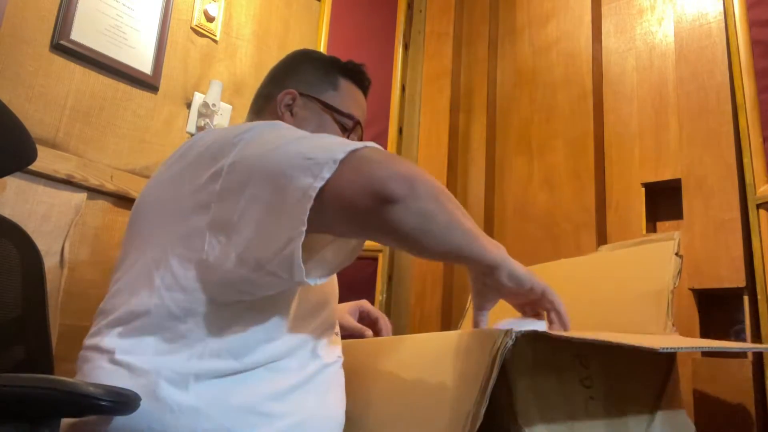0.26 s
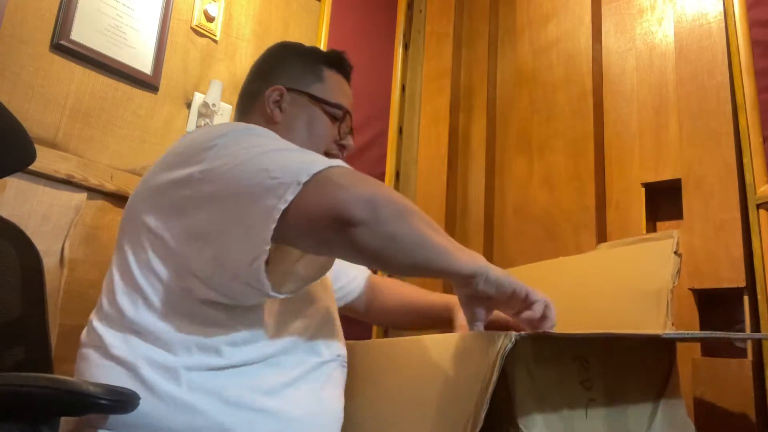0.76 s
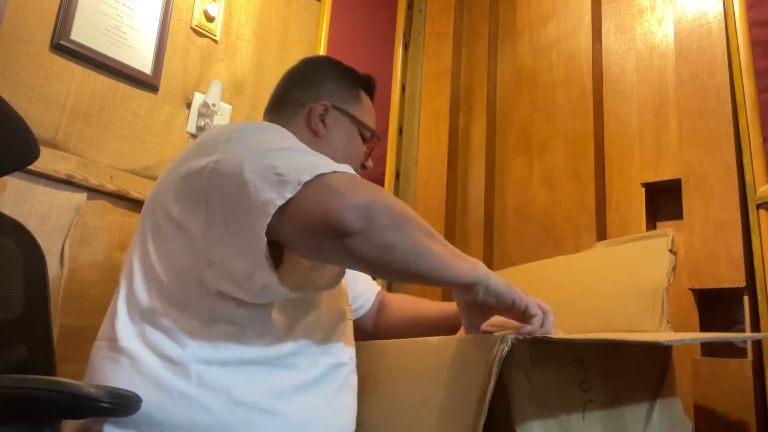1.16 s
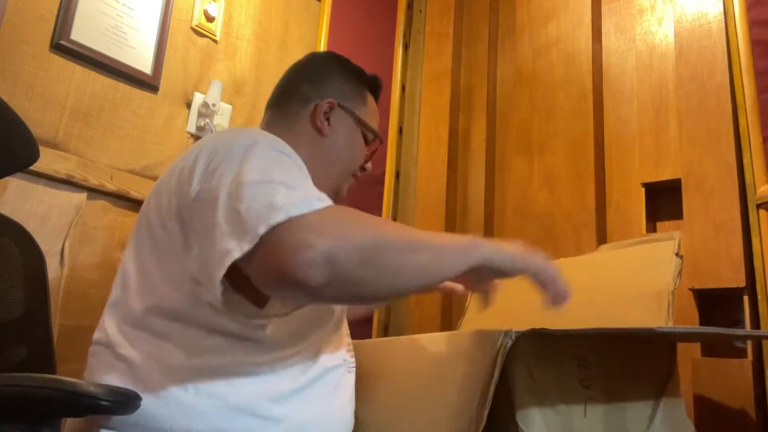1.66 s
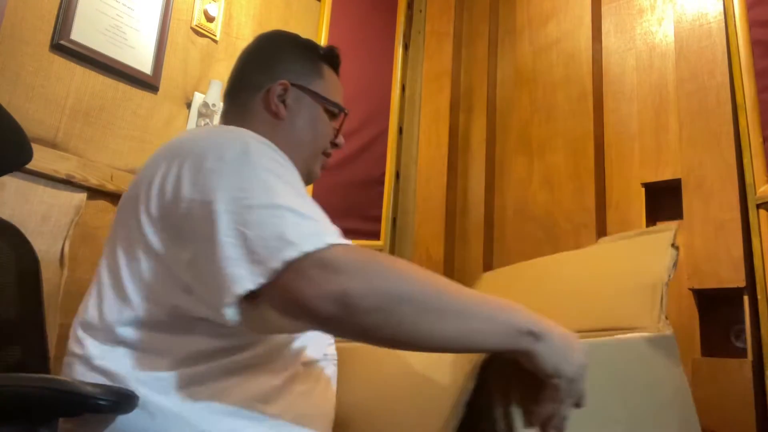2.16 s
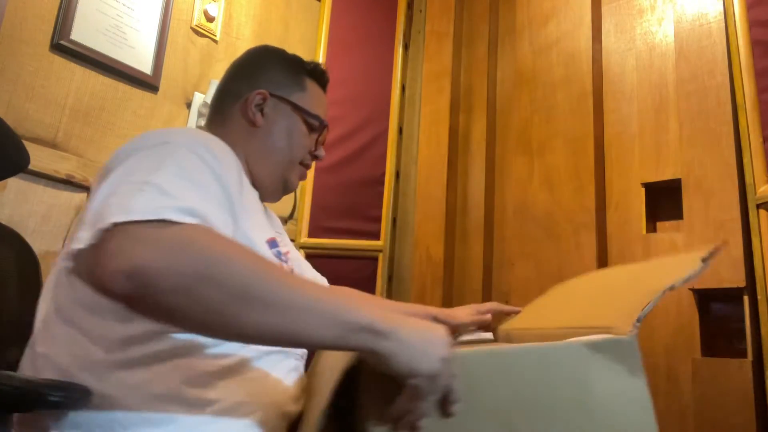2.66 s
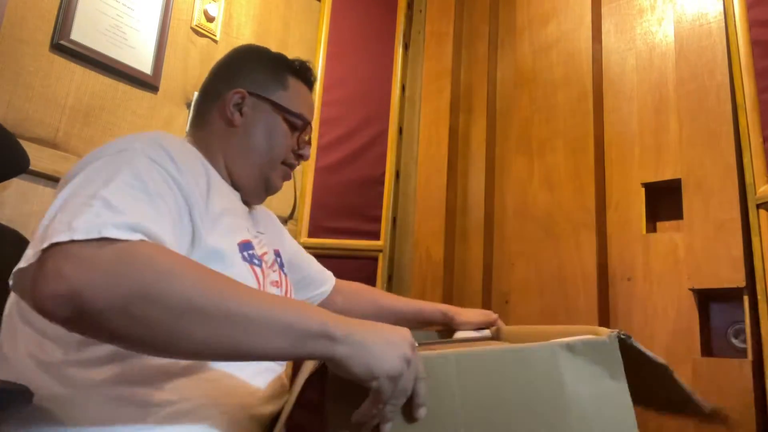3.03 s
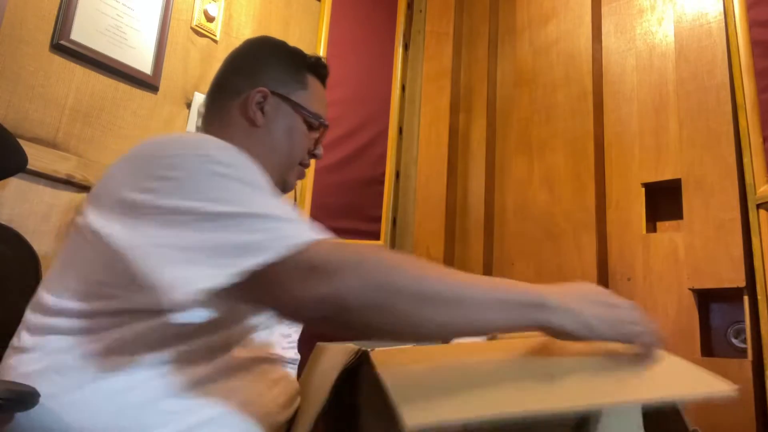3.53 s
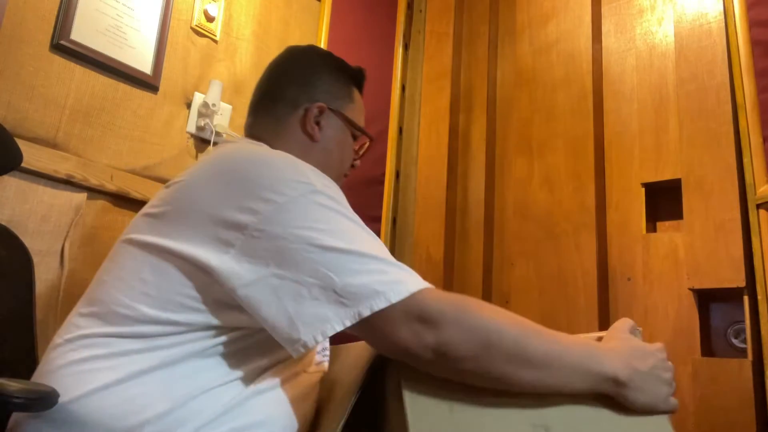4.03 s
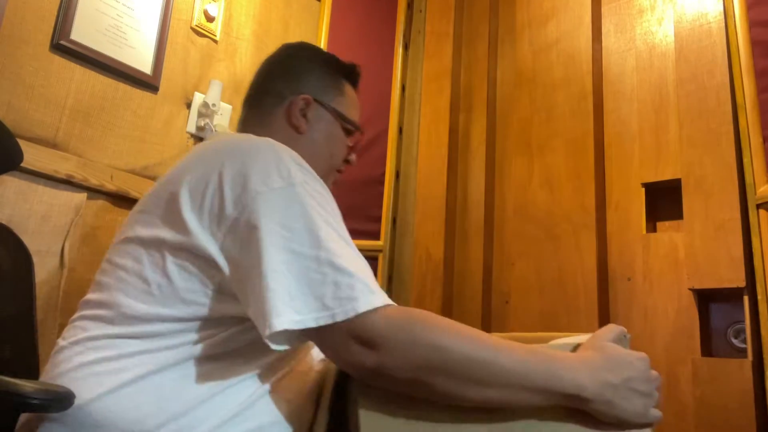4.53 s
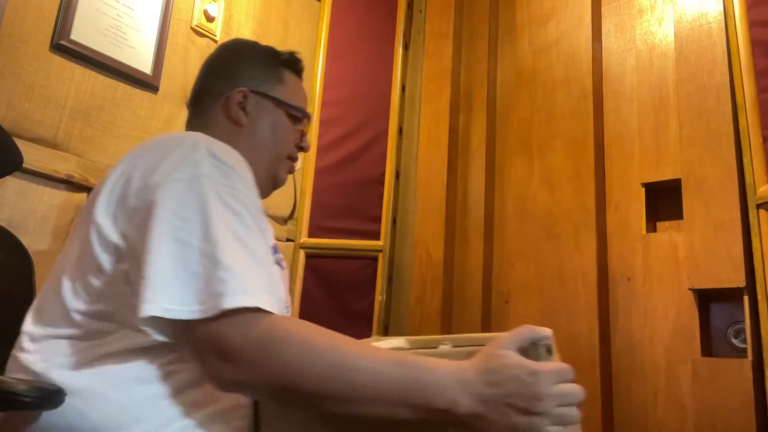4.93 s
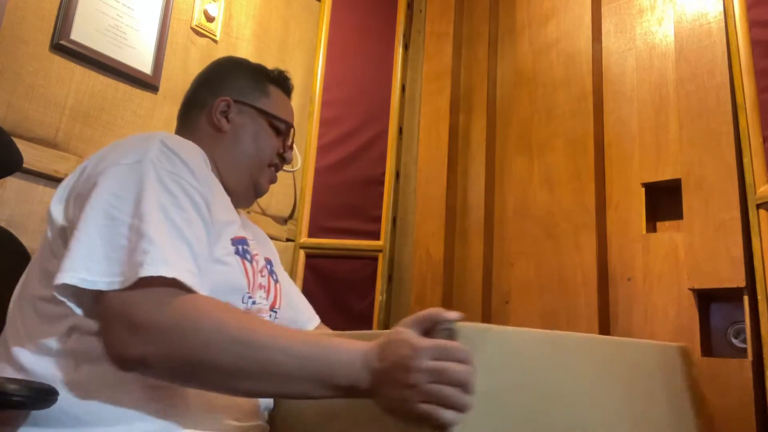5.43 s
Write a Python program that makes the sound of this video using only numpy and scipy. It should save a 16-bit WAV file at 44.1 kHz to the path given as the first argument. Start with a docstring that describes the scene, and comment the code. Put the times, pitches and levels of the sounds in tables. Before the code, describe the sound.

A large cardboard carton is handled close to a stereo microphone pair in a small, dry wood-panelled room. A dull knock and rub open it, then quiet shuffling, a busy run of flap knocks and scrapes, a loud flat slap, and finally growing raspy dragging with a heavy hollow thump.

```python
"""A cardboard carton is knocked, rubbed and dragged by hands in a small wood-panelled room.
Knocks ring modes of its flaps, creases and walls, with paper bursts; ticks ring tight clusters of paper modes.
Rubbing and rasping are gritty noise shaped by spectra and narrow bands; squeaks are noise in narrow bands.
A decaying-noise room answers the knocks and ticks; a close pair of microphones listens."""
import sys
import numpy as np
from scipy import signal
from scipy.fft import rfft, irfft, next_fast_len
from scipy.io import wavfile
from scipy.ndimage import uniform_filter1d

SR = 44100
rng = np.random.default_rng(int(sys.argv[2]) if len(sys.argv) > 2 else 0)


def master(y):
    """Save y as 16-bit WAV."""
    cut = np.clip(np.atleast_2d(y).T, -1, 1)
    pcm = np.round(cut * 32767)  # scale
    wavfile.write(sys.argv[1], SR, pcm.astype(np.int16))


N = 250693

# blows on the board, levels before the layer trims: t/s, clack level/dB, clack f/Hz, snap level/dB, snap f/Hz,
# crack level/dB, spit level/dB, boom level/dB, boom f/Hz
KNOCKS = [(0.163, -14.5, 305, -17, 1660, -36.5, -33.5, -20.5, 116),
          (0.185, -30, 252, -60, 1300, -65, -65, -28, 100), (0.524, -28, 388, -35, 1400, -56, -77, -38, 74),
          (0.691, -33, 350, -35, 1700, -46, -70, -62, 86),
          (0.83, -35.5, 322, -36, 1330, -54.5, -70, -62, 70),
          (1.02, -46, 458, -39, 870, -61, -76, -41.5, 113),
          (1.352, -43, 434, -49, 1180, -65, -84, -71, 109),
          (1.442, -37, 244, -65, 1370, -76, -66, -47, 152),
          (1.818, -26.5, 298, -72, 929, -78, -48, -22.5, 143),
          (1.938, -33.5, 433, -45, 1350, -54, -61, -31, 126),
          (1.988, -55, 283, -56, 2200, -55, -67, -34, 130),
          (2.039, -33.5, 543, -42, 977, -55, -71, -39, 117),
          (2.098, -19, 374, -35.5, 960, -60, -46, -39, 190),
          (2.13, -29, 244, -65, 1440, -60, -61, -25.5, 105),
          (2.221, -23, 324, -47, 1370, -51, -46, -30, 125), (2.231, -34, 276, -55, 923, -62, -57, -15, 118),
          (2.327, -67, 470, -22.5, 945, -45, -64, -29, 102),
          (2.347, -20, 364, -19, 1390, -47, -46, -28, 143), (2.4, -31, 360, -41, 1150, -59, -57, -30, 128),
          (2.466, -33.5, 238, -39, 1340, -60, -65, -55, 105),
          (2.507, -34.5, 315, -56, 1220, -65, -79, -38, 80),
          (2.603, -37, 317, -36.5, 1330, -52.5, -54, -65, 94),
          (2.651, -48, 320, -39, 1300, -76, -70, -63, 110),
          (2.701, -45, 397, -69, 1370, -42, -45, -59, 122),
          (2.864, -40.5, 300, -29, 1220, -59, -49, -47, 128),
          (3.123, -42, 243, -63, 1160, -74, -69, -33, 112),
          (3.353, -29, 510, -30.5, 1350, -43, -36, -61, 188),
          (3.363, -27.5, 250, -35, 1110, -49, -47, -65, 178),
          (3.434, -4.5, 506, -6, 1140, -49, -33, -24.5, 195),
          (3.443, -11, 250, -43, 851, -68, -58, -59, 167),
          (3.483, -34, 392, -62, 861, -62, -40, -34.5, 104),
          (3.753, -28.5, 540, -32, 1200, -53, -61, -37.5, 152),
          (3.788, -50, 300, -62, 1200, -53, -70, -43.5, 69),
          (3.883, -31.5, 264, -38, 1050, -52.5, -51, -26, 151),
          (3.97, -42, 520, -52, 1200, -64, -70, -58, 120),
          (4.032, -68, 300, -58, 1200, -77, -47.5, -66, 109),
          (4.07, -34, 355, -37, 1150, -54.5, -68, -21.5, 105.6),
          (4.351, -75, 234, -29.5, 1130, -66, -64.5, -47, 69.5),
          (4.558, -60, 288, -55, 1180, -46, -65, -44.5, 163),
          (4.602, -26.5, 365, -35, 1400, -52, -57, -43, 137),
          (4.712, -24, 213, -24, 1060, -45, -52, -25.5, 89),
          (5.022, -47, 500, -30.5, 1380, -59, -62, -46, 109),
          (5.114, -61, 500, -37, 1100, -60, -65, -51, 110),
          (5.158, -46, 520, -35, 1350, -59, -65, -59, 110),
          (5.208, -26, 560, -40, 1210, -54, -54, -35, 114),
          (5.243, -66, 500, -23.5, 1380, -41, -54, -32.5, 116),
          (5.312, -24, 238, -34, 1080, -45, -56, -30, 111),
          (5.44, -9, 178, -13.5, 920, -44.5, -37, -14, 103),
          (5.468, -18.5, 233, -56, 1300, -65, -65, -23, 110),
          (5.513, -20, 260, -43, 1320, -55, -43, -22.5, 118),
          (5.563, -30.5, 327, -55, 1460, -63, -74, -34, 118)]
# modes of big walls and air, of flaps, of stiff creases: f/Hz, relative level/dB, t60/s before hand damping
WALLS = [(55.3, 11.5, 0.29), (91.1, 6.5, 0.2), (108, 7, 0.15), (121.4, 4, 0.22), (143.3, 1, 0.22)]
FLAPS = [(193, 3.5, 0.05), (256.5, 4.5, 0.055), (293.4, 1, 0.054), (337, 1.5, 0.057), (438.5, 2, 0.063),
         (499, 5.5, 0.064), (554, -11, 0.037), (654, 2, 0.059)]
CREASES = [(974, 7.5, 0.034), (1116, 3, 0.02), (1232, 1, 0.024), (1372, -1, 0.02), (1730, -9.5, 0.035),
           (1836, -7.5, 0.056), (2055, 0, 0.026), (2280, -7, 0.008)]
# spectra of surface hiss and of fine fizz on paper: f/Hz, relative level/dB
HISS_SPECTRUM = [(800, -10.5), (1800, -3), (3000, -3), (5000, -5), (7500, -9), (10000, -14.5), (13000, -23)]
FIZZ_SPECTRUM = [(4000, -16.5), (7000, -8.5), (9500, -5), (12000, -9), (14500, -11.5), (16000, -24)]


def amp(db):
    """Amplitude ratio of a level in dB."""
    return 10 ** (np.asarray(db) / 20)


def unit(x):
    """x scaled to an RMS of 1."""
    return x / np.sqrt(np.mean(x ** 2) + 1e-20)


def along(points, hz):
    """Every column after the frequency, interpolated on a log-frequency axis."""
    f, *cols = np.transpose(points)
    return np.squeeze([np.interp(np.log(hz + 1), np.log(f + 1), c) for c in cols])


def filtered(x, response):
    """x filtered by a complex response of frequency."""
    m = next_fast_len(N + SR // 2)
    return irfft(rfft(x, m) * response(np.fft.rfftfreq(m, 1 / SR)), m)[..., :N]


def resonances(modes, hz, widen):
    """Sum of band-pass modes of alternating sign; t60 sets each width, scaled by widen."""
    total = 0
    for k, (centre_hz, db, t60_s) in enumerate(modes):
        width_hz = widen * np.log(1000) / np.pi / t60_s
        damped = 1j * hz * width_hz
        total = total + (-1) ** k * amp(db) * damped / (centre_hz ** 2 - hz ** 2 + damped)
    return total


def grit(per_s, spread_db, patchy_db):
    """Two noise streams roughened by shared tiny slips of uneven size, in patches of random gain."""
    slips = (rng.random(N) < per_s / SR) * amp(spread_db * rng.standard_normal(N))
    rough = 1 + signal.lfilter([1], [1, -.97], slips)  # each slip lasts about a millisecond
    z = signal.stft(rough * rng.standard_normal((2, N)), nperseg=512)[2]
    field = rng.standard_normal(z.shape[1:])
    field = uniform_filter1d(field, size=3, axis=0)  # frequency bins
    field = uniform_filter1d(field, size=8, axis=1)  # time frames
    return signal.istft(z * amp(patchy_db * unit(field)), nperseg=512)[1][:, :N]


def ring(modes, centre_hz, focus_db, damping, rise, t):
    """One blow on two paths: modes near the centre ring most, with random strength and slight detuning."""
    hz, db, t60_s = np.transpose(modes)[..., None]
    detune, strength_db, indirect_gain = rng.standard_normal((3, len(modes), 1)) * [[[.02]], [[2.5]], [[.8]]]
    phase = 2 * np.pi * hz * (1 + detune) * t
    off_centre_db = focus_db * np.log2(hz / centre_hz) ** 2  # focus_db at one octave away
    gain = amp(db + strength_db - off_centre_db - 60 * damping * t / t60_s)
    gain = gain * (1 - np.exp(-t / rise)) ** 2
    direct = (gain * np.sin(phase)).sum(axis=0)
    indirect = (indirect_gain * gain * np.cos(phase)).sum(axis=0)
    return np.array([direct, indirect]) / abs(direct).max()


def knocks():
    """Each contact clacks in the flaps, snaps in the creases, cracks and spits in the paper; the walls follow."""
    wall_delay_s = .006  # the heavy walls take time to get moving
    contact_cycles = 2.51  # contact time in clack periods: soft broad blows sound low
    base_damping, presses_per_db = 1.266, .02  # 1 = free board; stronger blows leave the hand pressing
    board, paper = np.zeros((2, N + SR)), np.zeros((2, 2, N + SR))
    t = np.arange(SR // 4) / SR
    for s, db, hz, snap_db, snap_hz, crack_db, spit_db, boom_db, boom_hz in KNOCKS:
        at, late = round(s * SR), round((s + wall_delay_s) * SR)
        contact_s = contact_cycles / hz
        damping = base_damping * np.exp(presses_per_db * (db + 33.5))
        clack = ring(FLAPS, hz, focus_db=35.5, damping=damping, rise=.53 * contact_s, t=t)
        snap = ring(CREASES, snap_hz, focus_db=49, damping=damping, rise=.16 * contact_s, t=t)
        boom = ring(WALLS, boom_hz, focus_db=58, damping=damping, rise=.0048, t=t)
        board[:, at:at + len(t)] += amp(db - 3) * clack + amp(snap_db - .5) * snap
        board[:, late:late + len(t)] += amp(boom_db - 2) * boom
        envelope = (1 - np.exp(-t / .0035)) * np.exp(-t / contact_s)
        burst = envelope * rng.standard_normal((2, 2, len(t)))
        paper[..., at:at + len(t)] += amp([[[crack_db + 18]], [[spit_db + 6]]]) * burst
    crack = filtered(paper[0, :, :N], lambda hz: amp(along(HISS_SPECTRUM, hz)))
    spit = filtered(paper[1, :, :N], lambda hz: amp(along(FIZZ_SPECTRUM, hz)))
    return board[:, :N] + crack + spit


def ticks():
    """A paper edge lets go: each dry tick rings a tight cluster of paper modes for a few milliseconds."""
    # t/s, direct-path peak level/dB, f/Hz
    tick_list = [(0.165, -48, 4300), (0.65, -42.5, 1290), (0.69, -39, 2220), (0.699, -35, 2770),
                 (1.938, -34.5, 2200), (2.33, -42, 2940), (2.346, -30.5, 5700), (2.466, -31, 5000),
                 (2.865, -40, 1480), (3.754, -32, 1770), (5.44, -48, 1950), (2.704, -31, 4350),
                 (2.709, -40, 3900), (3.435, -39, 2180), (3.433, -34, 4270), (4.607, -42, 2520),
                 (4.713, -39, 1810), (4.737, -24.5, 2440), (5.25, -26, 2650)]
    t60_s = .009
    out, t = np.zeros((2, N + SR)), np.arange(SR // 20) / SR
    for s, db, hz in tick_list:
        cluster = [(hz * step, 0, t60_s) for step in (.74, .83, .91, .97, 1.04, 1.12, 1.22, 1.35)]
        tick = ring(cluster, hz, focus_db=60, damping=1, rise=.0005, t=t)
        out[:, round(s * SR):][:, :len(t)] += amp(db) * tick
    return out[:, :N]


def rubbing():
    """Sliding contact shakes the walls, excites flaps and creases, and hisses and fizzes on the surface."""
    # narrow bands that tint the hiss: f/Hz, relative level/dB, t60/s before widening
    hiss_bands = [(2050, 4, 0.032), (2660, 0, 0.037), (2830, -0.5, 0.023), (3280, -6.5, 0.074),
                  (3560, -3.5, 0.052), (4380, 1.5, 0.02), (4790, -12.5, 0.08), (5650, -7, 0.027)]
    # spectrum of the wall rumble: f/Hz, relative level/dB
    rumble_spectrum = [(20, -11), (35, -23), (60, -8), (250, -5.5), (380, -6.5), (550, -49), (900, -86)]
    # spectrum of the board scrape: f/Hz, relative level/dB
    scrape_spectrum = [(150, -17), (300, -5), (500, -3), (650, -4.5), (790, -5.5), (1000, -5), (1250, -7.5),
                       (1800, -11), (2800, -18.5), (4500, -22), (8000, -62)]

    def walls(hz):
        return amp(along(rumble_spectrum, hz)) * (1 + 1.86 * abs(resonances(WALLS, hz, widen=.45)))

    def flaps(hz):
        return amp(along(scrape_spectrum, hz)) * (1 + .74 * abs(resonances(FLAPS + CREASES, hz, widen=1)))

    def tinted(hz):
        return amp(along(HISS_SPECTRUM, hz)) * (1 + .31 * abs(resonances(hiss_bands, hz, widen=.37)))

    rumble = filtered(grit(per_s=200, spread_db=2, patchy_db=1.5), walls)
    scrape = filtered(grit(per_s=250, spread_db=2.5, patchy_db=2), flaps)
    hiss = filtered(grit(per_s=150, spread_db=2, patchy_db=2.4), tinted)
    fizz = filtered(grit(per_s=200, spread_db=2, patchy_db=1.8), lambda hz: amp(along(FIZZ_SPECTRUM, hz)))
    return sum(gain * unit(layer) for gain, layer in zip(pressure(), (rumble, scrape, hiss, fizz)))


def pressure():
    """Gains of rumble, scrape, hiss, fizz: resting grip, strokes and the scuff of each knock add in power."""
    # hands resting and shifting: t/s, rumble level/dB, scrape level/dB, hiss level/dB, fizz level/dB
    grip = [(0.0, -56.5, -55.5, -67, -84), (0.3, -52.5, -57, -63, -86), (0.68, -54.5, -62.5, -79, -94),
            (0.85, -51, -50, -85, -79), (1.17, -59, -62.5, -82, -91), (1.23, -61.5, -74.5, -100, -99),
            (1.31, -63.5, -75, -80, -84), (1.41, -55, -71.5, -77, -100), (1.78, -58.5, -64, -66, -65),
            (1.95, -49.5, -54, -57, -56), (2.2, -45, -63, -55.5, -59), (2.55, -48, -51.5, -61, -98),
            (2.94, -50.5, -55.5, -57.5, -58.5), (3.3, -53.5, -52, -57, -64), (3.41, -55, -54, -59.5, -79),
            (3.5, -45, -58, -61, -63), (3.85, -65, -61.5, -60, -85), (4.18, -42.5, -49, -67, -77),
            (4.48, -53.5, -51, -54, -74), (4.97, -51.5, -59, -55, -61.5), (5.4, -46, -48, -48, -50.5),
            (5.68, -42.5, -45, -43, -50)]
    # sliding strokes: peak t/s, swell/s, fade/s, scrape level/dB, hiss level/dB, fizz level/dB
    strokes = [(0.15, 0.11, 0.13, -40, -49, -72), (0.288, 0.095, 0.027, -46, -46.5, -50.5),
               (0.39, 0.043, 0.061, -53, -51, -60.5), (0.52, 0.041, 0.016, -53, -51, -54),
               (0.63, 0.35, 0.059, -60.5, -64.5, -77), (0.84, 0.16, 0.19, -68, -56, -64),
               (0.94, 0.18, 0.093, -54.5, -68, -67.5), (1.11, 0.15, 0.086, -55, -62.5, -68),
               (1.18, 0.13, 0.046, -80, -68, -69.5), (1.36, 0.053, 0.19, -59, -68, -88),
               (1.47, 0.049, 0.056, -50, -59, -63.5), (1.55, 0.15, 0.054, -55.5, -57, -64),
               (1.95, 0.044, 0.11, -54, -50.5, -50), (2.06, 0.024, 0.14, -47, -69, -75),
               (2.11, 0.026, 0.033, -41.5, -48.5, -54), (2.25, 0.11, 0.067, -39, -46.5, -57),
               (2.34, 0.097, 0.076, -40.5, -45, -73), (2.42, 0.1, 0.13, -44.5, -46, -55),
               (2.61, 0.13, 0.21, -52.5, -52.5, -56.5), (2.85, 0.16, 0.1, -53, -59.5, -60),
               (3.06, 0.082, 0.1, -49.5, -79, -54), (3.35, 0.24, 0.054, -82, -74, -53),
               (3.484, .015, 0.18, -69, -53.5, -49.5), (3.61, 0.11, 0.036, -48, -52, -64),
               (3.75, 0.2, 0.15, -49, -53.5, -56), (3.89, 0.026, 0.21, -47.5, -55, -61),
               (4.18, 0.12, 0.22, -56, -44, -47), (4.27, 0.14, 0.16, -50, -48.5, -46),
               (4.358, 0.021, 0.19, -48.5, -49.5, -50), (4.62, 0.15, 0.32, -43, -48, -53),
               (4.739, 0.09, 0.16, -38, -46, -52), (4.849, 0.19, 0.12, -43.5, -46.5, -53),
               (5.05, 0.1, 0.029, -44, -54, -75), (5.22, 0.16, 0.19, -34, -38.5, -50.5),
               (5.308, 0.074, 0.066, -36.5, -39, -61), (5.4, 0.18, 0.23, -39.5, -46.5, -67)]
    # flare at a knock, rows tied to boom, clack, crack, spit: level re that part/dB, t60/s
    scuff = [(-22.5, 0.68), (-16, 0.049), (1.5, 0.082), (-6, 0.041)]
    # time each flare takes to swell 60 dB into the knock, same rows: swell/s
    scuff_swell_s = [
        [.006],
        [.008],
        [.006],
        [.006],
    ]
    lead_s = .036  # flare is computed from this long before the knock
    dull_db = 12.5  # a clack further than this over its snap is a padded thud and scuffs no harder
    s, *cols = np.transpose(grip)
    power = np.array([amp(2 * np.interp(np.arange(N) / SR, s, c)) for c in cols])
    for peak_s, swell_s, fade_s, *db in strokes:
        power[1:] += amp(2 * np.array(db))[:, None] * slide(peak_s, swell_s, fade_s)
    t = np.arange(SR // 4) / SR - lead_s
    offset_db, t60_s = np.transpose(scuff)[..., None]
    shape_db = offset_db - 60 * np.maximum(t / t60_s, -t / np.array(scuff_swell_s))
    for s, db, _, snap_db, _, crack_db, spit_db, boom_db, _ in KNOCKS:
        clack_db = min(db, snap_db + dull_db)
        flare = amp(2 * (np.c_[[boom_db, clack_db, crack_db, spit_db]] + shape_db))
        span = power[:, round((s - lead_s) * SR):][:, :len(t)]
        span += flare[:, :span.shape[1]]
    return np.sqrt(power)


def slide(peak_s, swell_s, fade_s):
    """Power of a contact that swells to a rounded peak and lets go."""
    edge_db, roundness = 19, 1.55  # drop one swell before or fade after the peak; 1 = pointed top, 2 = round
    t = np.arange(N) / SR - peak_s
    distance = np.where(t < 0, -t / swell_s, t / fade_s)
    return amp(-2 * edge_db * distance ** roundness)


def rasps():
    """A creased edge rasps: sparse, uneven slips over the corrugation, tinted by the creases, and fibre pops."""
    # peak t/s, swell/s, fade/s, level before the grain and crackle trims/dB
    strokes = [(0.39, 0.034, 0.048, -53), (0.51, 0.066, 0.018, -52), (2.23, .03, 0.041, -61),
               (2.29, .04, .03, -54), (2.37, .02, 0.044, -55), (2.43, 0.11, 0.14, -47.5),
               (2.87, 0.0081, 0.043, -61), (3.28, 0.25, 0.05, -55), (3.76, 0.038, 0.069, -48.5),
               (4.362, 0.026, 0.057, -42), (4.425, 0.027, 0.024, -46.5), (4.545, .03, 0.011, -51),
               (4.65, 0.026, 0.032, -46), (4.735, .025, 0.037, -48), (4.81, 0.027, 0.025, -59),
               (5.11, 0.088, 0.086, -45), (5.185, 0.034, 0.025, -35), (5.22, 0.016, 0.023, -42),
               (5.25, 0.011, 0.034, -32), (5.31, 0.022, 0.042, -35), (5.355, .02, 0.021, -44),
               (5.52, 0.018, 0.014, -40.5)]
    # spectrum of the grain: f/Hz, relative level/dB
    spectrum = [(700, -40), (950, -18), (1250, 1), (1550, -6.5), (1800, -6.5), (2100, -23), (2800, -9),
                (4000, -36)]
    pops_per_s, pop_spread_db = 350, 3

    def colour(hz):
        return amp(along(spectrum, hz)) * (1 + .56 * abs(resonances(CREASES, hz, widen=.81)))

    grain = filtered(grit(per_s=120, spread_db=4, patchy_db=4), colour)
    pops = (rng.random(N) < pops_per_s / SR) * amp(pop_spread_db * rng.standard_normal(N))
    pops = pops * rng.standard_normal((2, N))
    crackle = filtered(pops, lambda hz: resonances(FLAPS[5:] + CREASES[:5], hz, widen=1.2))
    power = sum(amp(2 * db) * slide(*shape) for *shape, db in strokes)
    return (amp(-2) * unit(grain) + amp(-3) * unit(crackle)) * np.sqrt(power)


def squeaks():
    """A sliding flap edge hums or squeaks: friction noise in one narrow band, swelling and fading."""
    # start t/s, end t/s, f/Hz, half-width (1/e)/Hz before levelling, level before the stroke envelope/dB
    squeak_list = [(0.77, 0.96, 3595, 22, -66), (0.92, 1.08, 3635, 20, -68), (3.85, 4.11, 3640, 25, -68),
                   (3.205, 3.355, 508, 29.5, -50.5), (5.16, 5.23, 2000, 60, -50),
                   (5.17, 5.29, 640, 40, -46)]
    out, t = np.zeros((2, N)), np.arange(N) / SR
    for start_s, end_s, hz, width_hz, db in squeak_list:
        narrow = filtered(rng.standard_normal((2, N)), lambda f: np.exp(-((f - hz) / width_hz) ** 2))
        envelope = abs(signal.hilbert(narrow, next_fast_len(N))[:, :N])
        narrow = narrow / envelope ** .7  # wavers more in pitch than in strength
        stroke = np.sin(np.pi * np.clip((t - start_s) / (end_s - start_s), 0, 1)) ** .36
        out += amp(db) * stroke * unit(narrow)
    return out


def room(x):
    """The panelled walls answer with a noise tail, each frequency dying at its own speed."""
    # f/Hz, t60/s
    decay = [(80, 0.31), (400, 0.11), (2000, 0.05), (10000, 0.076)]
    hz, t, z = signal.stft(rng.standard_normal((2, SR // 2)), SR, nperseg=256)
    tail = signal.istft(z * amp(-60 * t / along(decay, hz)[:, None]), SR, nperseg=256)[1]
    delayed = np.pad(x, ((0, 0), (300, 0)))  # samples
    return signal.fftconvolve(delayed, tail / np.linalg.norm(tail[0]), axes=1)[:, :N]


def scene():
    """Two sound paths from the carton; the room answers the blows only."""
    blows = knocks() + ticks()
    return blows + amp(-12.5) * room(blows) + rubbing() + rasps() + squeaks()


def record(dry):
    """The pair blends both paths with frequency-dependent likeness, lead and balance, up to its band limit."""
    # f/Hz, likeness/0-1, right lead/rad, left minus right level/dB
    pair = [(30, .95, 0, 0), (70, .97, 0, -1.2), (200, .93, 0, -1.5), (350, .78, 0, .6), (520, .5, .4, 2.5),
            (690, .55, 2.1, 1.8), (860, .8, 2.7, -2.2), (1030, .78, 2.85, -4.8), (1380, .5, .4, -4.2),
            (1800, .3, 1.4, -.4), (5000, .25, 2.2, .4), (7000, .72, 2.7, 0), (8000, .87, 2.6, -.6),
            (9000, .72, 2.05, 0), (10000, .7, 1.05, 0), (11000, .99, 0, 0), (13700, .97, 0, 0),
            (14500, .55, 0, 0)]
    top_hz, ceiling = 15830, .95

    def share(hz, side):
        alike, lead_rad, balance_db = along(pair, hz)
        turn = np.arccos(np.clip(alike, 0, 1)) / 2
        blend = np.array([np.cos(turn), side * np.sin(turn)])
        return blend * amp(side * balance_db / 2) * np.exp(-.5j * side * lead_rad)

    ports = [filtered(dry, lambda hz: share(hz, side)).sum(axis=0) for side in (1, -1)]
    rounded = ceiling * np.tanh(np.array(ports) / ceiling)  # the preamplifier rounds off the loudest slap
    return filtered(rounded, lambda hz: hz < top_hz)


dry = scene()
out = record(dry)
master(out)
```